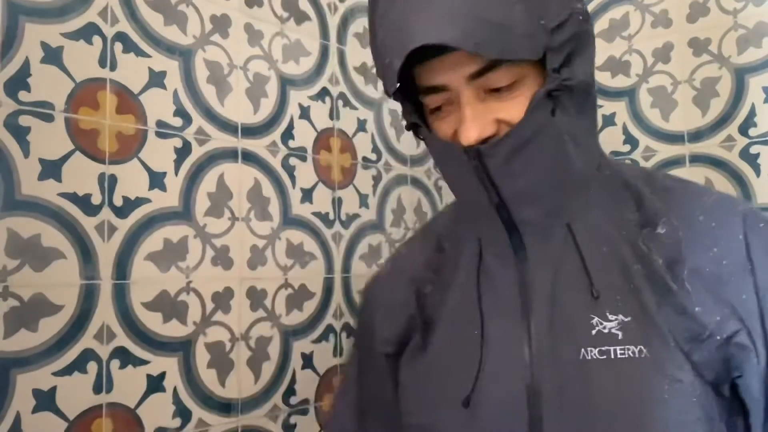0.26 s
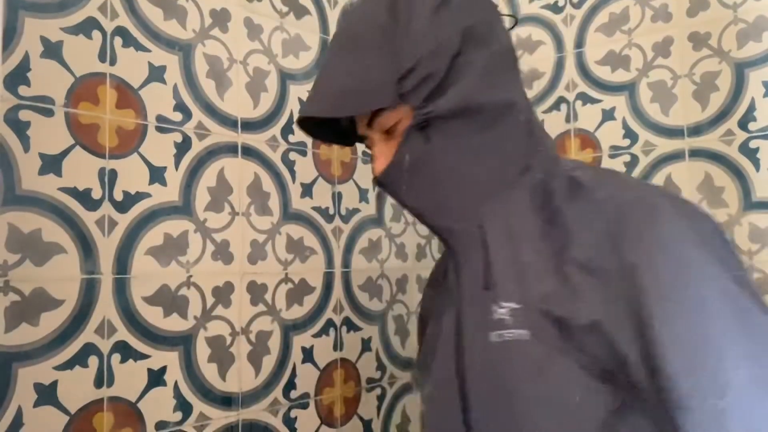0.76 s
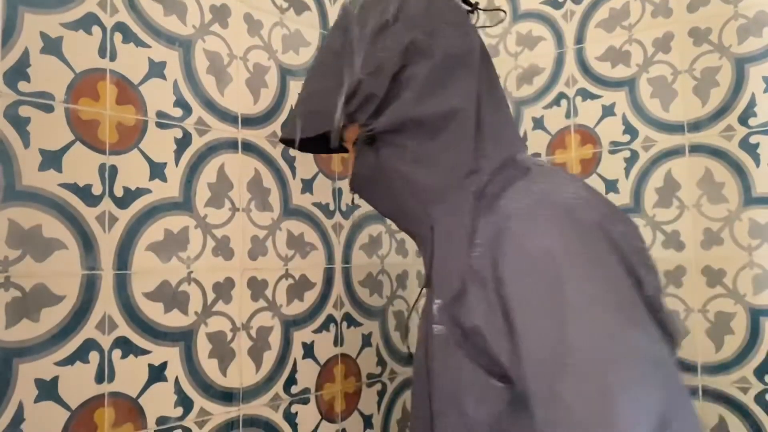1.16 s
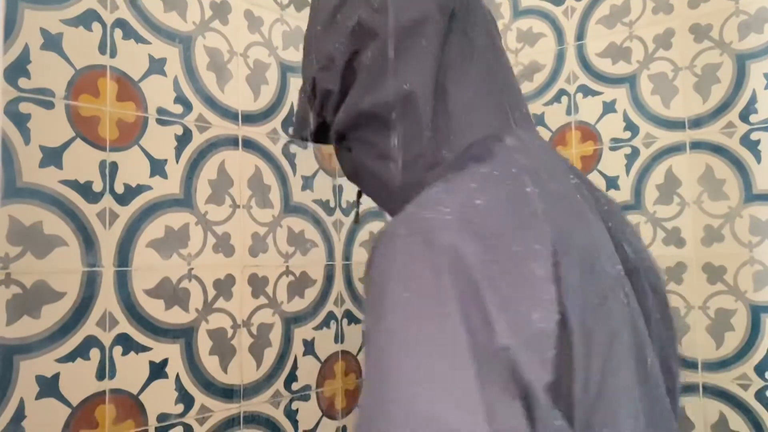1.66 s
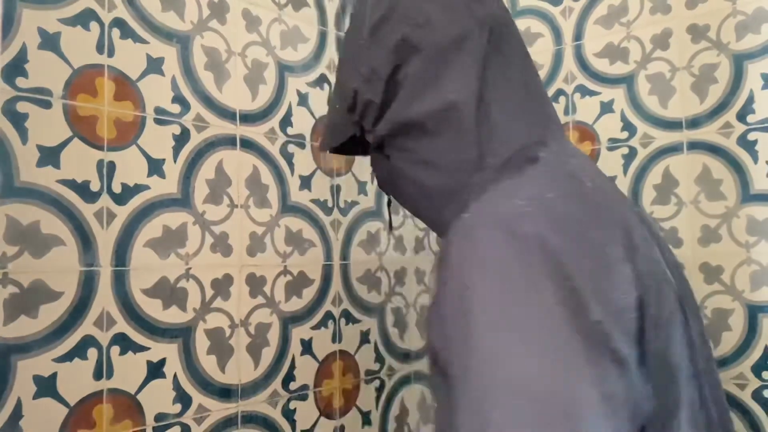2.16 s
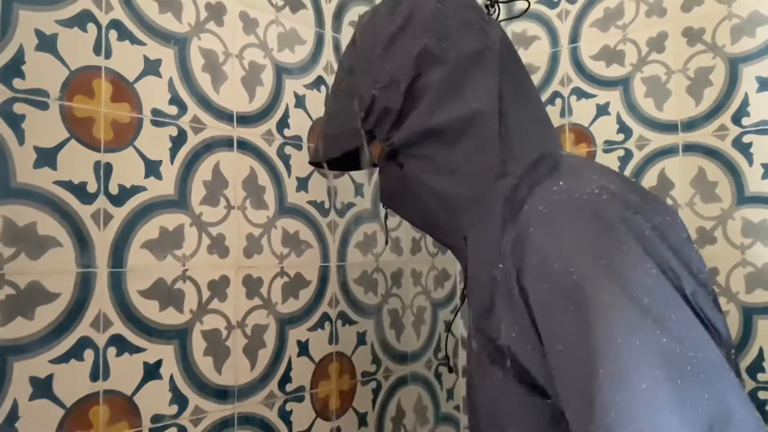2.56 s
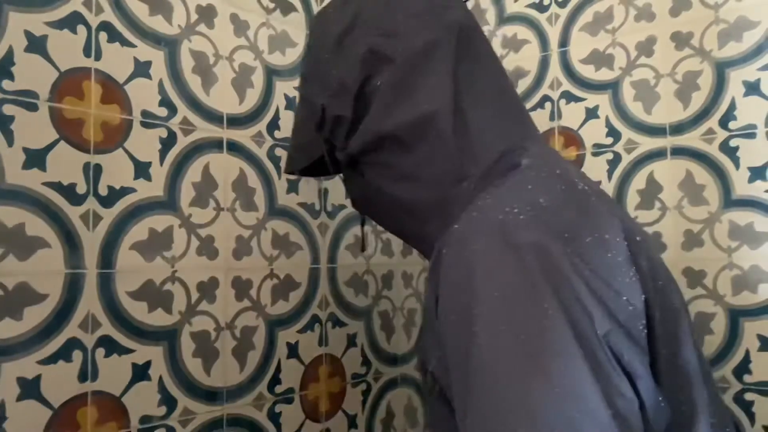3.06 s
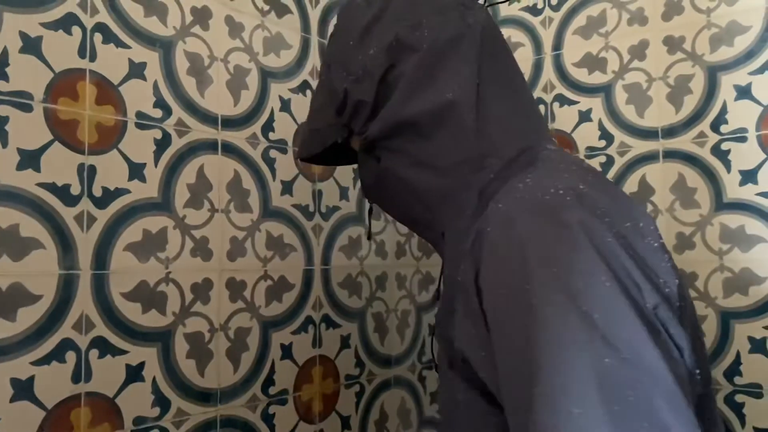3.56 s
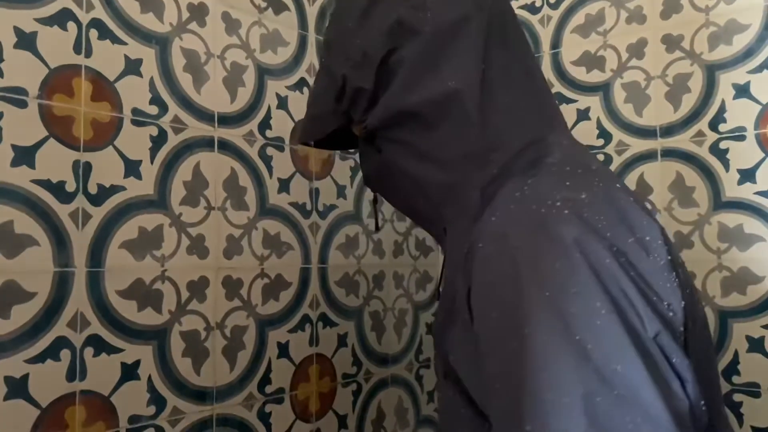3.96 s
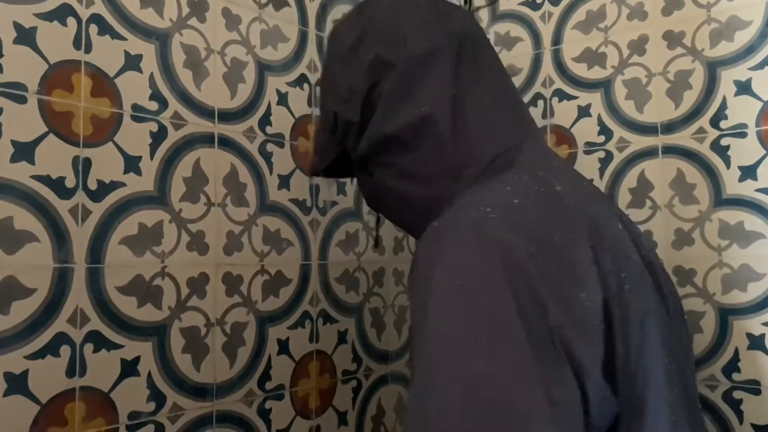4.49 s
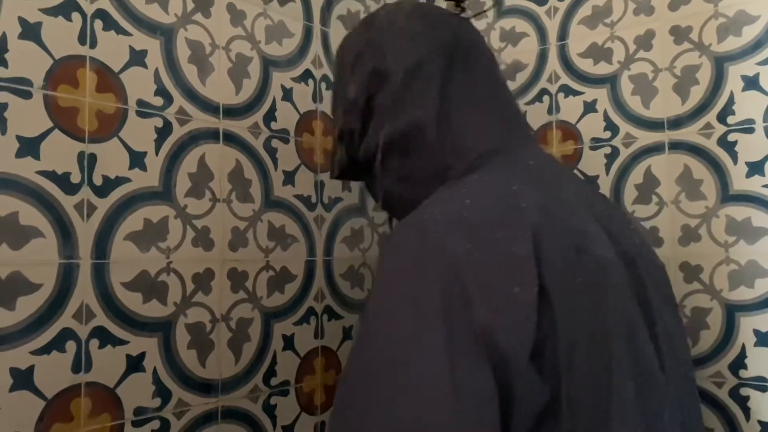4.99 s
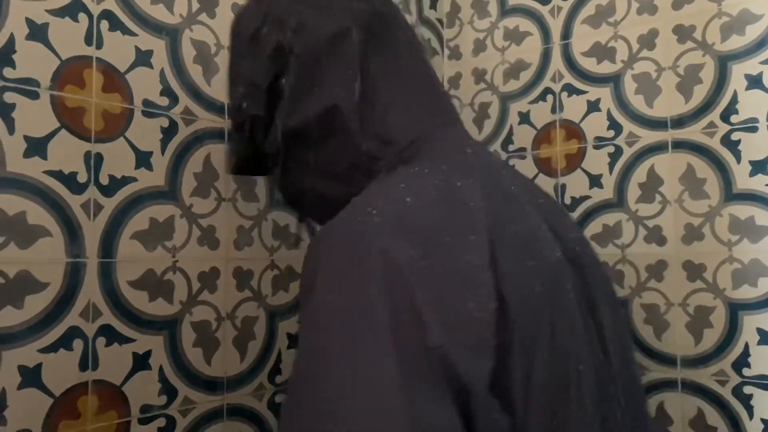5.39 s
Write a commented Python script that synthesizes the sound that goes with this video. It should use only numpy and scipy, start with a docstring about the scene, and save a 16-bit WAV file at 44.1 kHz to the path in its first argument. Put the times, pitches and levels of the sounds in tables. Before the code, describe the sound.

A running shower hits a hooded rain jacket, drumming, sizzling and snapping on the fabric over a low hum in a tiled room.

```python
"""A shower runs on someone in a hooded waterproof jacket, who turns slowly in a small tiled bathroom.
From the start, drops drum on the hood, spray sizzles on the shoulders and a low hum swells and fades.
The jet draws sliding, hollow notes from the hood; sharp taps snap on the fabric and ring off the tiles.
Around 3 s the drumming eases. Near 3.6 s it comes back, while the spray and taps grow faint.
From about 4.5 s the spray and taps are strong again."""
import sys
import numpy as np
from scipy import signal
from scipy.fft import rfft, irfft, next_fast_len
from scipy.io import wavfile
from scipy.ndimage import uniform_filter1d, map_coordinates

SR = 44100
rng = np.random.default_rng(int(sys.argv[2]) if len(sys.argv) > 2 else 0)


def bounce(signal):
    """Save signal as a 16-bit WAV file at the path given by the first command-line argument."""
    frames = np.transpose(np.atleast_2d(signal))
    limited = np.clip(frames, -1, 1)
    pcm = np.round(limited * 32767).astype(np.int16)
    wavfile.write(sys.argv[1], SR, pcm)


N = 248283

# how much spray reaches the shoulders: time_s, strength_db
ON_SHOULDERS = [(0.0, -52.5), (0.17, -50), (0.3, -45), (0.45, -47.5), (0.66, -40), (0.84, -50.5),
                (0.97, -45), (1.22, -44), (1.62, -45), (1.98, -42.5), (2.36, -39.5), (2.5, -44),
                (2.76, -43.5), (2.95, -39.5), (3.15, -42), (3.45, -46.5), (3.6, -58), (3.8, -57.5),
                (4.36, -51), (4.52, -39.5), (4.88, -42), (5.05, -38.5), (5.3, -41.5), (5.63, -44)]


def amp(db):
    """Turn decibels into a number to multiply by."""
    return 10 ** (np.asarray(db) / 20)


def unit(x):
    """Scale a sound to an average power of 1."""
    return x / np.sqrt(np.mean(x ** 2) + 1e-20)


def along(points, hz):
    """Read between rows of (pitch_hz, value), with octaves evenly spaced."""
    pitches, values = np.transpose(points)
    return np.interp(np.log(hz + 1), np.log(pitches + 1), values)


def curve(points):
    """Join rows of (time_s, value) into one value per sample."""
    return np.interp(np.arange(N) / SR, *np.transpose(points))


def wobble(rate):
    """A smooth random curve through rate points a second."""
    points = rng.standard_normal(int(N * rate / SR) + 4)
    return map_coordinates(points, [np.arange(N) * rate / SR])


def filtered(x, response):
    """Multiply each frequency in x by response(hz)."""
    size = next_fast_len(N + SR // 2)
    return irfft(rfft(x, size) * response(np.fft.rfftfreq(size, 1 / SR)), size)[..., :N]


def standing_waves(hz):
    """The room and the hood boost the pitches at which they ring."""
    # their ringing notes: pitch_hz, width_hz, boost_db
    notes = [(80.7, 2.7, 11), (94, 4.5, 14.5), (165.2, 4.6, 8.5), (185, 4, -1), (231.1, 4.3, 11),
             (244, 5.9, 8.5), (290.8, 6.6, 10), (341.4, 9.6, 8.5), (403.4, 16, 7.5), (511.4, 7.3, 7),
             (658, 16, 9.5), (750, 6.7, 9), (918, 5.3, 6)]
    return 1 + sum((amp(db) - 1) / (1 + (2 * (hz - pitch) / width) ** 2) for pitch, width, db in notes)


def bathroom(direct_db, spiky_db, near_db, size=16384):
    """A click and its echoes off the tiles, in two rows: shared by left and right, and unshared."""
    # how long the echoes take to fade by 60 dB: pitch_hz, fade_s
    fade_times = [(150, 0.6), (1000, 0.17), (1800, 0.27), (4000, 0.26), (8000, 0.33), (16000, 0.31)]
    hz, s, noise = signal.stft(rng.standard_normal((2, size)), SR, nperseg=256)
    fade = amp(-60 * s / along(fade_times, hz)[:, None])
    echoes = signal.istft(noise * fade, SR, nperseg=256)[1][:, :size]
    # the near walls answer first, with a few strong echoes
    t = np.arange(size) / SR
    spread = np.log(amp(spiky_db)) * np.exp(-t / 0.029)
    near_walls = 1 + amp(near_db) * np.exp(-t / 0.005)
    echoes = echoes * near_walls * np.exp(spread * rng.standard_normal(size) - spread ** 2)
    echoes /= np.linalg.norm(echoes[0])
    echoes[0, 0] += amp(direct_db)
    return echoes / np.linalg.norm(echoes[0])


def drops(colour, per_s, scatter_db, direct_db, places=4):
    """Drops of uneven size land at random on a few places, each with its own echoes."""
    n = N + SR // 4  # the room is already ringing at the start
    hits = (rng.random(n) < per_s / SR) * rng.choice([-1, 1], n)
    hits = hits * amp(scatter_db * np.clip(rng.standard_normal(n), -2, 2))
    place = rng.integers(places, size=n)
    heard = np.zeros((2, N))
    for k in range(places):
        room = bathroom(direct_db, spiky_db=5, near_db=-27)
        heard += signal.fftconvolve((hits * (place == k))[None], room, axes=1)[:, n - N:n]
    return unit(filtered(heard, lambda hz: amp(along(colour, hz)) * standing_waves(hz)))


def follow(stream, level_db, growth, usual_db=-43):
    """Drops get louder with their stream: growth dB for each dB above its usual strength."""
    return amp(level_db + growth * (curve(stream) - usual_db))


def shower():
    """Big drops drum, patter and splash on the hood; small ones sizzle on the shoulders."""
    # how hard the jet hits the hood as the wearer turns: time_s, strength_db
    on_hood = [(0.0, -40.5), (0.12, -38.5), (0.56, -44.5), (0.72, -42), (0.92, -40.5), (1.24, -42.5),
               (2.4, -43.5), (2.76, -49), (2.88, -54), (3.12, -50.5), (3.52, -54.5), (3.64, -46.5),
               (3.88, -43.5), (5.62, -41)]
    # gushes of heavy drops: middle_s, half_length_s, boost_db
    gushes = [(0.533, 0.15, 6), (1.183, 0.09, 2.5), (2.382, 0.098, 3.5)]
    # the tone colour of each drop size, from big to tiny: pitch_hz, level_db
    drum_colour = [(70, -0.5), (120, -5), (165, 3.5), (240, -1), (350, -5.5), (520, 3), (900, -59),
                   (2000, -72)]
    patter_colour = [(200, -22.5), (380, -10), (550, -5.5), (950, 0), (1300, -12), (2200, -51), (5000, -58)]
    splash_colour = [(600, -28), (1100, 0), (1400, 3), (2200, 1.5), (3000, -1.5), (4500, -7.5), (9000, -24)]
    spray_colour = [(1300, -57), (2500, -4.5), (3500, -7), (5000, -5.5), (7300, -6.5), (8500, -2.5),
                    (10500, -53), (16000, -47)]
    mist_colour = [(5500, -6.5), (8000, -7), (9500, 4), (11500, 2.5), (13500, 1.5), (15500, 0)]
    t = np.arange(N) / SR
    gush_db = sum(db * np.exp(-((t - middle_s) / half_s) ** 2) for middle_s, half_s, db in gushes)
    spurts_db = 2 * wobble(rate=20)  # fine drops come in uneven spurts
    drum = drops(drum_colour, per_s=600, scatter_db=3, direct_db=-8.5, places=6)
    drum *= follow(on_hood, level_db=-49.5, growth=0.58)
    patter = drops(patter_colour, per_s=550, scatter_db=2.5, direct_db=-9)
    patter *= follow(on_hood, level_db=-47.5, growth=1.46)
    splash = drops(splash_colour, per_s=900, scatter_db=9.5, direct_db=-13.5)
    splash *= follow(on_hood, level_db=-45, growth=1.16)
    spray = drops(spray_colour, per_s=320, scatter_db=8.5, direct_db=-12, places=8)
    spray *= follow(ON_SHOULDERS, level_db=-46.5, growth=0.77)
    mist = drops(mist_colour, per_s=230, scatter_db=9.5, direct_db=-8, places=8)
    mist *= follow(ON_SHOULDERS, level_db=-43.7, growth=0.88)
    return amp(gush_db) * (drum + patter) + splash + amp(spurts_db) * (spray + mist)


def low_note(pitch_hz, drift_hz):
    """A pure tone whose pitch wanders a little."""
    hz = pitch_hz + drift_hz * wobble(rate=4.15)
    return unit(np.sin(2 * np.pi * np.cumsum(hz) / SR))


def hum():
    """A low hum swells and fades over a faint rumble; weaker notes make it throb."""
    # how the main note and the rumble rise and fall: time_s, level_db
    hum_levels = [(0.0, -54), (0.2, -44), (0.36, -50), (0.56, -40.5), (1.12, -37), (1.56, -71),
                  (1.76, -40.5), (2.28, -42), (2.72, -31), (3.0, -39), (3.44, -37.5), (3.8, -33),
                  (4.28, -41.5), (5.04, -44), (5.16, -40.5), (5.62, -46)]
    rumble_levels = [(0.0, -47), (0.5, -47), (0.95, -43.5), (1.35, -49), (3.0, -46.5), (4.4, -50),
                     (5.63, -53.5)]
    # the weaker notes: pitch_hz, level_db
    side_notes = [(46.3, -55), (81, -56)]
    # the rumble's tone colour: pitch_hz, level_db
    rumble_colour = [(12, -35), (25, -2), (42, 1.5), (60, 0), (90, -7.5), (120, -7.5), (250, -37)]
    tone = amp(curve(hum_levels) - 1.8) * low_note(pitch_hz=54.2, drift_hz=0.22)
    tone += sum(amp(db) * low_note(hz, drift_hz=0.93) for hz, db in side_notes)
    noise = rng.standard_normal((2, N))
    rumble = unit(filtered(noise, lambda hz: amp(along(rumble_colour, hz)) * standing_waves(hz)))
    shared_only = np.array([[1], [0]])
    return tone * shared_only + amp(curve(rumble_levels)) * rumble


def hood_notes():
    """Drops ring a tight panel of the hood; the note slides as the jet moves and holds where it rests."""
    # the jet slides over the panel: start_s, end_s, from_hz, to_hz, half_width_octaves, level_db
    slides = [(0.0, 0.34, 2500, 1500, 0.31, -53), (0.034, 0.363, 1150, 1150, 0.67, -42.5),
              (0.218, 0.56, 1000, 1140, 0.4, -43), (0.376, 0.697, 1200, 2150, 0.34, -43),
              (1.553, 1.778, 880, 420, .42, -41.5), (2.267, 2.525, 990, 610, 1, -45),
              (2.484, 2.79, 510, 476, 0.75, -50), (3.384, 3.505, 500, 540, 0.22, -50.5),
              (3.406, 3.493, 980, 1040, .2, -54), (4.39, 4.795, 604, 750, 0.52, -47),
              (4.63, 4.874, 1330, 1210, 0.25, -46), (4.778, 5.023, 940, 765, 0.35, -47.5),
              (4.95, 5.225, 880, 700, 0.45, -40.5), (5.44, 5.577, 640, 432, 0.59, -41)]
    # the jet rests on one spot: start_s, end_s
    rests = [(1.5, 2.11), (3.63, 4.45)]
    # the notes it rings there: pitch_hz, half_width_octaves, level_db
    rest_notes = [(1380, 0.091, -50), (2034, 0.11, -49.5)]
    held = [(start, end, hz, hz, octaves, db) for start, end in rests for hz, octaves, db in rest_notes]
    even_colour = [(300, 0), (2000, 0)]
    hits = drops(even_colour, per_s=560, scatter_db=3.5, direct_db=-4.5)
    hz, s, spectrum = signal.stft(hits, SR, nperseg=1024)
    out = np.zeros((2, N))
    for start, end, from_hz, to_hz, octaves, db in slides + held:
        progress = np.clip((s - start) / (end - start), 0, 1)
        pitch_hz = from_hz * (to_hz / from_hz) ** progress
        octaves_away = np.log2((hz[:, None] + 1) / pitch_hz)
        gain = np.sin(np.pi * progress) / (1 + (octaves_away / octaves) ** 2)
        note = signal.istft(spectrum * gain, SR, nperseg=1024)[1][:, :N]
        time_share = abs(end - start) * SR / N  # keeps short notes from coming out louder
        out += amp(db - 2.5) * unit(note) * np.sqrt(time_share)
    return out


def shortest_click(gain):
    """The shortest click that has this gain at each frequency (minimum phase)."""
    cepstrum = irfft(np.log(np.maximum(gain, 1e-6)))
    half = len(cepstrum) // 2
    cepstrum[1:half] *= 2
    cepstrum[half + 1:] = 0
    return irfft(np.exp(rfft(cepstrum)))


def ring(pitch_hz, octaves):
    """The tone colour of a patch of fabric that rings briefly around one pitch."""
    return lambda hz: 1 / (1 + abs(np.log2((hz + 1) / pitch_hz) / octaves) ** 3.3) ** 1.6


def add_snap(out, start_s, colour, db, direct_db, near_db):
    """Mix in one hit on the fabric and the echoes the tiles send back."""
    hz = np.fft.rfftfreq(2048, 1 / SR)
    # every crease gives the tone its own small peaks and dips
    creases_db = 2.2 * unit(uniform_filter1d(rng.standard_normal(len(hz)), size=9))
    click = shortest_click(colour(hz) * amp(creases_db))
    room = bathroom(direct_db, spiky_db=3.5, near_db=near_db, size=12288)
    heard = signal.fftconvolve(click[None], room, axes=1)
    heard = amp(db + 31.5) * heard / np.linalg.norm(heard[0])
    out[:, round(start_s * SR):][:, :heard.shape[1]] += heard


def light_taps(per_s=12, usual_hz=6300, spread_octaves=0.55, half_width_octaves=0.34):
    """Rows for lighter taps that fall at random and follow the strength of the spray."""
    when, stray = rng.random((int(per_s * N / SR), 2)).T
    times = when * N / SR
    pitches = usual_hz * 2 ** (spread_octaves * (2 * stray - 1))
    strengths = np.interp(times, *np.transpose(ON_SHOULDERS))
    return [(s, db - 4.5, hz, half_width_octaves, db - 6.5)
            for s, db, hz in zip(times, strengths, pitches)]


def taps():
    """Each tap is a sharp tick and a brief ring of stiff fabric; slack fabric gives a dull knock."""
    # the loud taps: start_s, relative_ring_db, pitch_hz, half_width_octaves, relative_tick_db
    loud_taps = [(0.079, -41.5, 6300, 0.53, -47), (0.194, -43, 8000, 1, -44), (0.2165, -34, 4000, 2, -28),
                 (0.3384, -35.5, 8400, 1.1, -29), (0.6, -37, 2200, 1.1, -46),
                 (0.6236, -36.5, 6400, 0.73, -43), (0.682, -53, 8000, 1.1, -37.5),
                 (0.699, -38, 4640, 0.7, -44), (0.7324, -40, 4450, 1.5, -39),
                 (0.787, -41.5, 6670, 0.38, -40), (0.861, -47, 8000, 1, -41),
                 (0.8775, -35.5, 4160, 0.66, -46), (0.924, -41, 2600, 1.7, -36.5),
                 (0.954, -39, 4400, .6, -34), (0.9872, -44, 7500, .7, -34.5), (1, -38.5, 7100, 0.55, -33.5),
                 (1.105, -40, 4930, .45, -52), (1.118, -36, 6800, .7, -34.5),
                 (1.247, -38.5, 2710, 1.7, -40.5), (1.338, -42, 8000, 0.9, -35.5),
                 (1.357, -31.5, 4230, 1.1, -37.5), (1.4716, -31.5, 6400, 0.5, -41),
                 (1.536, -37, 7500, 1, -31.5), (1.5402, -28, 4400, 0.85, -42),
                 (1.593, -34, 4400, 0.31, -39), (1.6043, -41, 7000, .8, -37), (1.7, -44, 7000, 1, -40),
                 (1.724, -29, 4740, 0.78, -34), (1.785, -38, 6200, 0.55, -50),
                 (1.8588, -37, 5500, 0.71, -38), (1.989, -33, 4200, 0.63, -51),
                 (2.032, -33, 7950, 0.66, -30), (2.102, -31.5, 6800, 1, -40),
                 (2.1754, -28.5, 2800, 1.18, -36), (2.189, -24.5, 6800, 0.54, -47),
                 (2.3018, -33, 3600, 0.71, -41), (2.384, -37, 6840, 0.45, -33),
                 (2.539, -37.5, 5160, 1.35, -37.5), (2.575, -39, 1460, 1.06, -35.5),
                 (2.6533, -32, 6000, 1.35, -27.5), (2.682, -35, 2960, 1.9, -43),
                 (2.7626, -46, 4500, 0.74, -41), (2.8216, -43.5, 6600, 0.23, -62),
                 (2.8444, -24.8, 3150, 1.07, -43), (2.93, -54, 7000, 0.9, -39),
                 (2.9872, -34, 5800, 0.96, -33.5), (3.045, -40, 6100, 0.47, -36.5),
                 (3.0969, -33, 3550, 0.65, -40), (3.186, -38, 6450, 1.1, -33),
                 (3.2133, -32.5, 4150, 0.78, -43), (3.277, -39.5, 6800, .6, -35.5),
                 (3.308, -40, 5430, 0.4, -52), (3.3534, -36.5, 7960, 1.5, -27.5),
                 (3.679, -47, 5870, 0.51, -46), (3.745, -41, 6460, 0.48, -40.5),
                 (3.8383, -48, 5330, 0.9, -53), (4.048, -45, 4350, 0.8, -48.5),
                 (4.0962, -44.5, 8000, 1.5, -47), (4.3651, -62, 8000, 1.2, -45),
                 (4.4222, -40.5, 6900, .5, -41), (4.454, -27.5, 3120, 0.72, -34.5),
                 (4.564, -54, 7000, 1.1, -37), (4.599, -35, 5760, 1.05, -35.5),
                 (4.712, -52, 7000, 1.2, -44), (4.738, -35, 2700, 1.1, -39),
                 (4.7633, -31.5, 3530, 0.67, -35.5), (4.968, -35.5, 6030, 0.82, -36),
                 (5.012, -34.5, 3970, 2, -42), (5.0749, -44, 7000, .6, -35), (5.153, -31, 4800, 0.74, -34),
                 (5.25, -36.5, 5100, 0.57, -39), (5.338, -31.5, 3540, 1.35, -36.5),
                 (5.361, -27, 4730, 1, -34), (5.415, -25, 3930, 0.65, -36)]
    # the tick's tone colour: pitch_hz, level_db
    tick_colour = [(4000, -30.5), (8000, 1), (10000, 3), (12000, 4), (13500, 2.5), (15500, 0)]
    # the dull knocks: start_s, relative_level_db, pitch_hz
    knocks = [(1.14, -45.5, 196), (2.575, -45, 400), (2.684, -40.5, 460), (2.685, -46, 915),
              (4.738, -41.5, 185), (4.74, -37, 1090), (5.35, -44.5, 215)]
    out = np.zeros((2, N + SR))
    tick = lambda hz: amp(along(tick_colour, hz))
    for start_s, ring_db, pitch_hz, octaves, tick_db in loud_taps + light_taps():
        add_snap(out, start_s, ring(pitch_hz, octaves), ring_db, direct_db=-15, near_db=-4.5)
        add_snap(out, start_s, tick, tick_db, direct_db=-9, near_db=-5)
    for start_s, db, pitch_hz in knocks:
        add_snap(out, start_s, ring(pitch_hz, octaves=0.58), db, direct_db=-2.5, near_db=0)
    return out[:, :N]


def microphones(pair):
    """Two microphone openings share part of the sound, with small gaps in timing and level."""
    # how alike left and right are: pitch_hz, likeness (1 is the same)
    likeness = [(60, 0.7), (200, 1), (400, 0.7), (650, -0.18), (1100, 0.3), (1650, -0.1), (2300, .5),
                (4300, 0.6), (5300, 0.31), (6100, 0.1), (6500, 2.3), (9000, 0.94)]
    # how far the left wave runs ahead: pitch_hz, lead_radians
    left_lead = [(0, 0), (1500, 0), (3300, -.6), (4300, -.1), (7400, 0), (8500, -2.95), (9500, -3.3),
                 (10500, -6.1), (11600, -6.4), (12700, -9.3), (13700, -9.55), (14700, -12.45)]
    # how much louder the left is: pitch_hz, left_minus_right_db
    balance = [(50, -0.4), (250, -4), (600, 0.5), (1200, 2), (3000, 1.5), (6000, 1.5), (8000, -1.5)]

    def shares(hz):
        angle = np.arccos(np.clip(along(likeness, hz), -1, 1)) / 2
        return np.array([np.cos(angle), np.sin(angle)])

    def sides(hz):
        lead = np.interp(hz, *np.transpose(left_lead))
        left = amp(along(balance, hz) / 2) * np.exp(0.5j * lead)
        return np.array([left, 1 / left])

    shared, unshared = filtered(pair, shares)
    return filtered(np.array([shared + unshared, shared - unshared]), sides)


def scene():
    """Water, hood notes, taps and hum, heard on the left and right."""
    return microphones(shower() + hood_notes() + taps() + hum())


def record(dry):
    """The recorder cuts off the very highest treble."""
    return filtered(dry, lambda hz: hz < 15800)


dry = scene()
out = record(dry)
bounce(out)
```